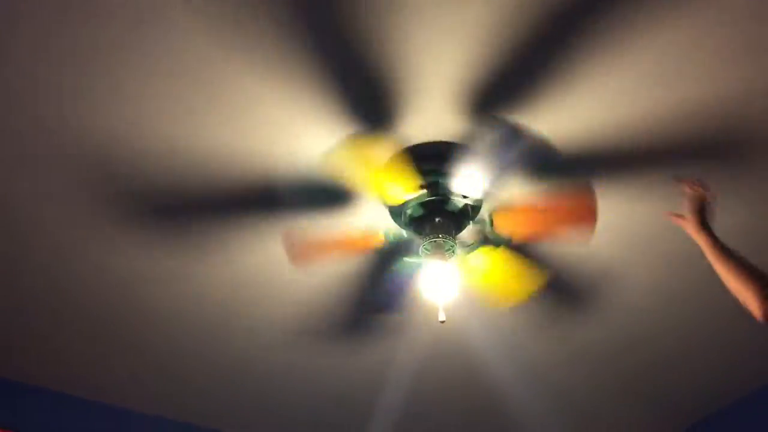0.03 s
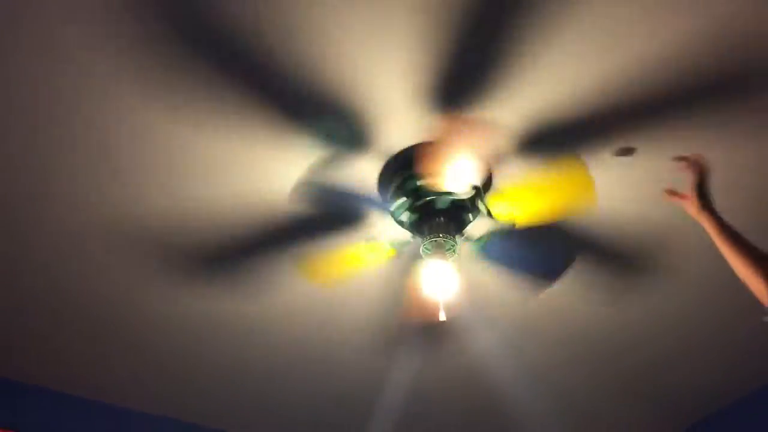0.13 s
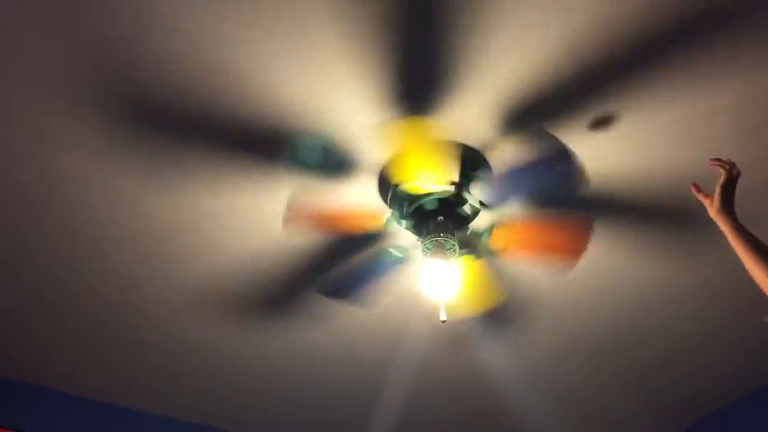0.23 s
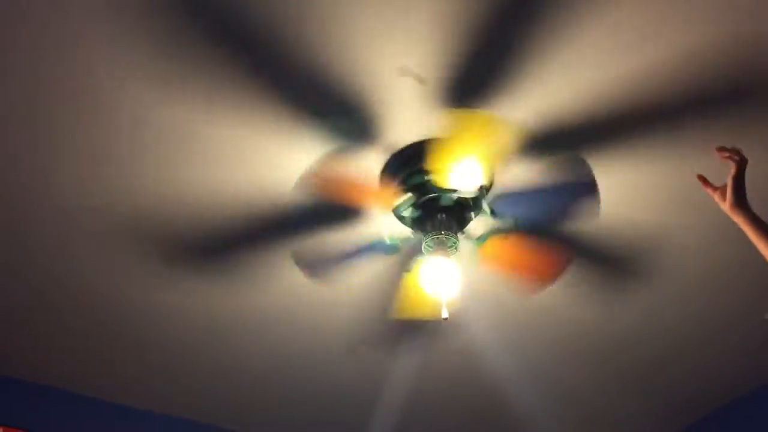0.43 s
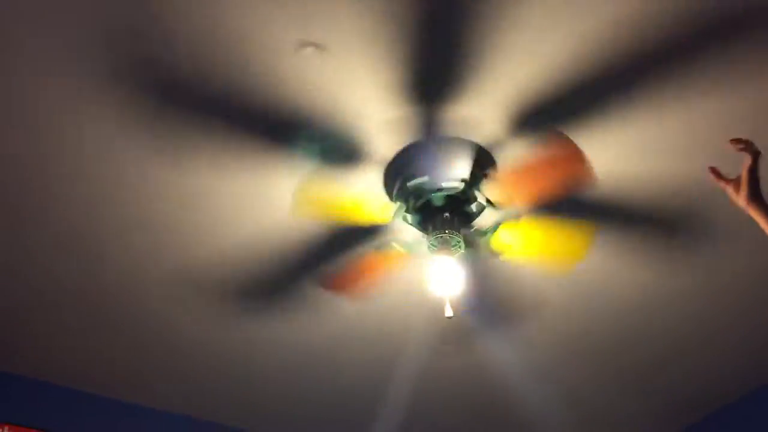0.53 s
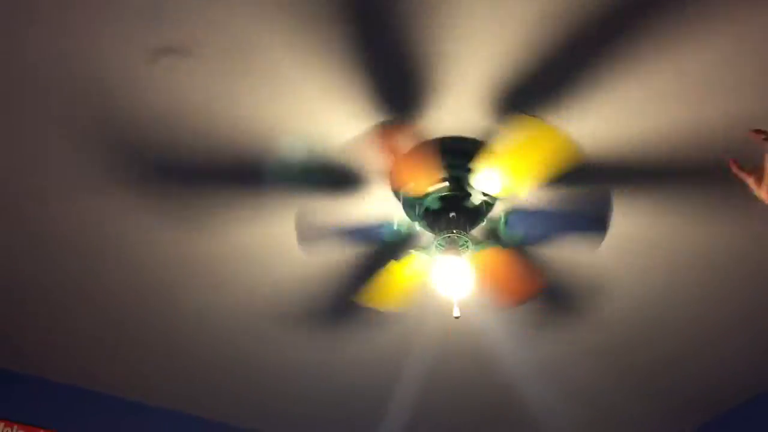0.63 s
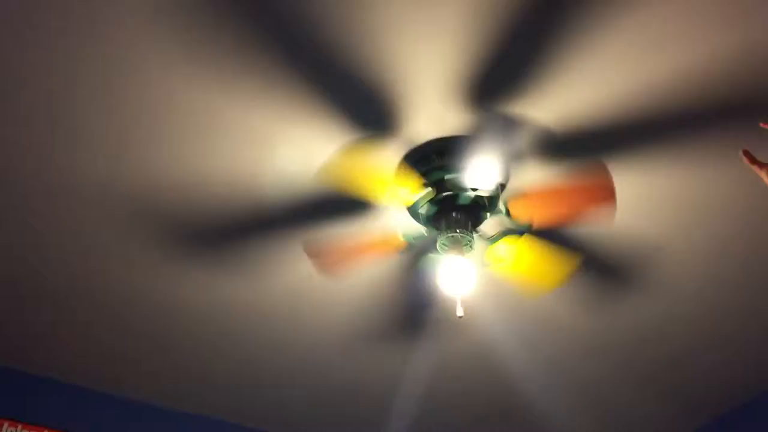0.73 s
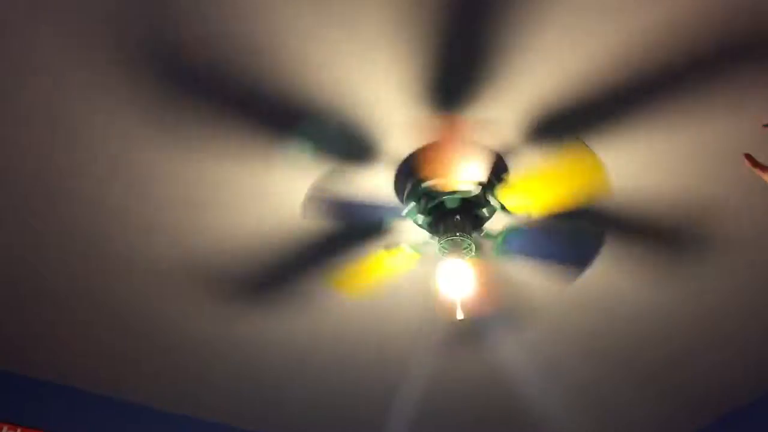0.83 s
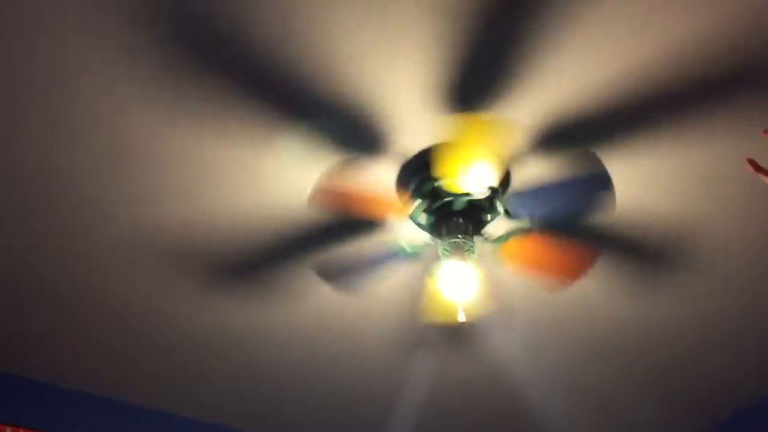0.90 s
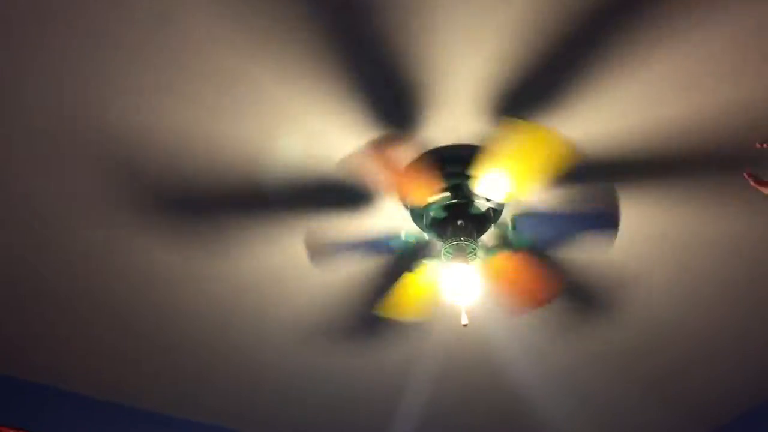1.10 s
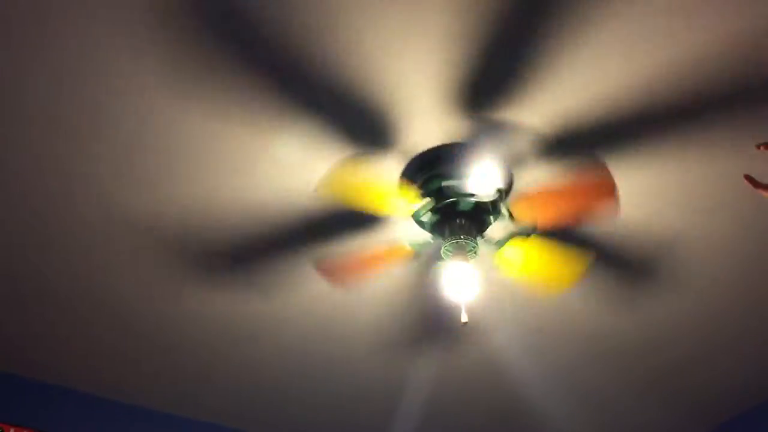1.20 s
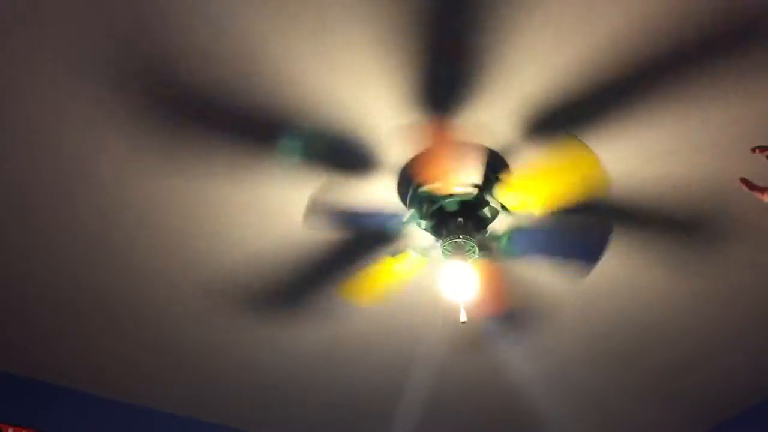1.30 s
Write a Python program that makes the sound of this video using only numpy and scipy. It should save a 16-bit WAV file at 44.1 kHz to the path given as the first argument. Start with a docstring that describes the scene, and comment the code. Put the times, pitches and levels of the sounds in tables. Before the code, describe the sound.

A small hard object cracks against a ceiling fan blade in a bare-sounding room. It first clicks lightly at about 0.2 seconds, then the blade hits it at 0.35 seconds with one loud, sharp crack that rings briefly. Around 1 second it lands farther off with a soft, tumbling thud. The fan's quiet, low motor hum and faint moving air continue throughout.

```python
"""In a bare-sounding room, a small hard object is tossed at a spinning ceiling fan.
It leaves the hand with a faint tick and clicks on the way up, probably against the ceiling.
A blade strikes it with a crack, exciting the damped normal modes of both bodies, and it lands
further off with a soft thud. Reflections and a reverberant tail follow the impacts.
Throughout, the motor hums at harmonics of the mains frequency over a little moving air."""
import sys
import numpy as np
from scipy import signal
from scipy.fft import rfft, irfft
from scipy.io import wavfile
from scipy.ndimage import uniform_filter1d

SR = 44100
rng = np.random.default_rng(int(sys.argv[2]) if len(sys.argv) > 2 else 0)


def store_pcm(level_fs):
    """Save levels as 16-bit WAV."""
    pcm = np.round(np.clip(level_fs, -1, 1) * 32767).astype(np.int16)
    wavfile.write(sys.argv[1], SR, np.atleast_2d(pcm).T)


N = 59535

# Contacts of each kind: t/s, level/dB
BLADE_HITS = [(0.3543, 9.14)]
BRUSH = [(0.1937, -16)]
GLANCES = [(0.1938, -16.5), (0.1972, -9.5), (0.1996, -9.5), (0.2018, -9.5), (0.2069, -14)]
LANDINGS = [(1.030, -27), (1.039, -19.5), (1.0465, -22.5), (1.0545, -22.5)]
RELEASE = [(0.127, -40), (0.135, -38.5)]
# Spectral envelopes of the contacts: f/Hz, relative level/dB
CRACK_SPECTRUM = [(120, -35.5), (300, -25), (480, -25), (650, -14.5), (850, -18), (1130, -11.5), (1330, -2),
                  (1550, -7), (1790, -6.5), (2060, -12), (2450, -4), (2680, -9.5), (2930, -2.5),
                  (3400, -9.5), (4400, -2), (4900, -5.5), (5600, -1.5), (6800, -10), (9000, -13.5),
                  (11000, -19.5), (15000, -24)]
BRUSH_SPECTRUM = [(100, -13.5), (220, 4), (450, 0), (650, 1), (850, -1), (1200, 4), (3000, -0.5),
                  (7000, -8), (15000, -17.5)]
GLANCE_SPECTRUM = [(120, -22.5), (280, -17), (1000, -13.5), (2900, -9.5), (4300, 0.5), (5400, 0),
                   (6200, -4.5), (7800, -35), (9700, -20), (11500, -32.5), (15000, -35)]
THUD_SPECTRUM = [(70, -16), (150, 7.5), (260, -2), (440, 4), (560, -15), (950, -11), (1600, -14),
                 (2900, -26.5), (3900, -20), (5000, -32.5), (15000, -44)]
RELEASE_SPECTRUM = [(300, -16), (1400, 3), (4000, -3), (8000, -10.5), (15000, -20)]
# Normal modes of the blade and the heavily damped object: f/Hz, relative level/dB, T60/s
BLADE_MODES = [(983, -9, 0.38), (1081.7, -15, .28), (1294, -1, .3), (1706, -10, 0.35), (1767, -1, 0.44),
               (2430, -5.5, 0.23), (2451, -3, 0.19), (2853, -7, .32), (2942, -2.5, .34), (4030, -7, .28),
               (4372, -1.5, 0.17), (4432.4, -4, .28), (5070, -3, 0.22), (5850, -5.5, .26)]
OBJECT_MODES = [(4050, -7, 0.019), (5350, -1.5, .022), (5937.7, -9, .014)]
# Ticks of the tumbling object: t/s, level/dB, f/Hz
LANDING_TICKS = [(1.0343, -50.5, 3860), (1.0392, -44.5, 1980), (1.0471, -39.5, 1140), (1.055, -53.5, 3840),
                 (1.0575, -55, 1320), (1.073, -51.5, 1000), (1.096, -59, 1090)]
# Harmonics of the motor hum: f/Hz, level/dB
HUM_HARMONICS = [(60, -71), (120.05, -42.5), (240.1, -71), (360.2, -77.5), (480.2, -77), (720.3, -90),
                 (960.4, -87), (1080.5, -87)]
# Noise spectra of the swinging arm and the moving air: f/Hz, relative level/dB
RUSTLE_SPECTRUM = [(200, -5), (700, -2), (2000, -2), (4000, -9), (8000, -15), (15000, -16)]
AIR_SPECTRUM = [(20, -17), (40, -14), (60, -4), (85, 5), (150, -6), (190, -10.5), (235, -2.5), (275, -18.5),
                (350, -15), (450, -27), (600, -26.5), (1000, -27.5), (2000, -28), (4000, -33.5),
                (8000, -39.5), (15000, -42)]
# Reverberation time of the room: f/Hz, T60/s
ROOM_T60 = [(150, .3), (500, 0.28), (1000, 0.34), (1700, 0.51), (3000, 0.37), (5500, 0.38), (8000, .31),
            (14000, .22)]
# Early reflections: delay/s, amplitude ratio
REFLECTIONS = [(.0074, 0.23), (0.0103, 0.1), (0.0125, .35), (.022, 0.4)]


def blade_strike():
    """Impact excitation: the blade bats the object away with a crack, and both vibrate freely."""
    bodies = undb(-26.5) * ring(BLADE_MODES, waver_db=2) + undb(-6) * ring(OBJECT_MODES)
    radiated = high_pass(bodies, hz=1100, order=4)  # the ringing carries no low thump
    ringing = convolve(impulses([(s, 0) for s, _ in BLADE_HITS]), radiated)
    return ringing + contact(BLADE_HITS, CRACK_SPECTRUM, t60=0.018, wet_db=1)


def glance():
    """Oblique impact on a hard surface: brief contacts give a bright snap, a brush and a rattle."""
    edge = high_pass(rng.standard_normal(N) * decay(t60=0.0052), hz=4700, order=1)
    snap = convolve(impulses([(s, -31.5) for s, _ in BRUSH]), edge)
    brush = contact(BRUSH, BRUSH_SPECTRUM, t60=0.031, wet_db=-2.5)
    rattle = contact(GLANCES, GLANCE_SPECTRUM, t60=0.014, wet_db=1.5)
    return snap + brush + rattle


def landing(tick_t60=0.0097):
    """Inelastic collision: the object thuds and tumbles, each edge ticking at its own frequency."""
    ticks = sum(convolve(impulses([(s, db)]), ring([(hz, 0, tick_t60)])) for s, db, hz in LANDING_TICKS)
    return convolve(ticks, room(wet_db=-13)) + contact(LANDINGS, THUD_SPECTRUM, t60=0.033, wet_db=-5)


def toss(swing_end_s=0.3, fade_s=0.15):
    """Friction noise: the swinging arm rustles, and the object slips off the fingers with a tick."""
    swing = np.clip((swing_end_s - np.arange(N) / SR) / fade_s, 0, 1)
    rustle = undb(-73) * swing * noise(RUSTLE_SPECTRUM)
    return rustle + contact(RELEASE, RELEASE_SPECTRUM, t60=0.03, wet_db=2.5)


def motor_hum():
    """Forced vibration: the motor hums chiefly at twice the mains frequency; each harmonic wavers."""
    t, hum = np.arange(N) / SR, 0
    for k, (hz, db) in enumerate(HUM_HARMONICS):
        waver_db = 0.9 if k == 1 else 1.5  # the strongest harmonic is the steadiest
        amplitude = np.sqrt(2) * undb(db + waver_db * drift(per_s=18))
        hum = hum + amplitude * np.sin(2 * np.pi * (hz * t + rng.random()))
    return hum


def moving_air(flutter_db=3.5, flutter_below_hz=600):
    """Flow noise: moving air gives a faint broadband hiss whose bass flutters."""
    air = noise(AIR_SPECTRUM)
    bass = signal.sosfiltfilt(signal.butter(2, flutter_below_hz, fs=SR, output="sos"), air)
    flutter = undb(flutter_db * drift(per_s=13))
    return undb(-60) * (air - bass + bass * flutter)


def room(wet_db, size=20480, build_s=0.004, grain=0.45):
    """Reverberation: direct sound, early reflections and a grainy tail decaying band by band."""
    t, hz = np.arange(size) / SR, np.fft.rfftfreq(size, 1 / SR)
    scatter = rfft(rng.standard_normal(size) * np.exp(grain * rng.standard_normal(size)))
    tail = 0
    for centre, t60 in ROOM_T60:
        band = along([(f, f == centre) for f, _ in ROOM_T60], hz)
        tail = tail + irfft(scatter * band) * decay(t60, size)
    response = undb(wet_db) * unit_energy(tail * (1 - np.exp(-t / build_s)))
    response[0] += 1
    for delay, gain in REFLECTIONS:
        response[int(delay * SR)] += gain
    return response


def contact(rows, spectrum, t60, wet_db):
    """Source and filter: shaped bursts, each with its own room tail because the object moves."""
    pulse, out = click(spectrum), np.zeros(N)
    for s, db in rows:
        start = int(s * SR)
        burst = convolve(noise_burst(t60), pulse)
        heard = convolve(burst, room(wet_db))[:N - start]
        out[start:start + len(heard)] += undb(db) * heard
    return out


def ring(modes, waver_db=0):
    """Modal superposition: damped sinusoids of alternating sign, whose levels may waver."""
    t, out = np.arange(N) / SR, 0
    for k, (hz, db, t60) in enumerate(modes):
        level_db = db + waver_db * drift(per_s=45) if waver_db else db
        out = out + (-1) ** k * undb(level_db) * decay(t60) * np.sin(2 * np.pi * hz * t)
    return out


def click(spectrum, size=2048):
    """Minimum phase: folding the cepstrum gives the shortest causal pulse with this spectrum."""
    magnitude = undb(along(spectrum, np.fft.rfftfreq(size, 1 / SR)))
    cepstrum = irfft(np.log(magnitude))
    cepstrum[1:size // 2] *= 2
    cepstrum[size // 2 + 1:] = 0
    return unit_energy(irfft(np.exp(rfft(cepstrum))))


def noise_burst(t60, size=4096, smooth_bins=16):
    """Whitening: decaying noise with its broad spectral humps evened out."""
    spectrum = rfft(rng.standard_normal(size) * decay(t60, size), 2 * size)
    power = uniform_filter1d(np.abs(spectrum) ** 2, smooth_bins)
    return unit_energy(irfft(spectrum / np.sqrt(power))[:size])


def noise(spectrum):
    """Spectral shaping: stationary noise of unit rms."""
    magnitude = undb(along(spectrum, np.fft.rfftfreq(N, 1 / SR)))
    x = irfft(rfft(rng.standard_normal(N)) * magnitude, N)
    return x / x.std()


def impulses(rows):
    """Impulse approximation: one spike for each contact."""
    out = np.zeros(N)
    for s, db in rows:
        out[int(s * SR)] += undb(db)
    return out


def drift(per_s):
    """Random modulation: smoothed steps with a spread near one."""
    hold = int(SR / per_s)
    steps = np.repeat(rng.standard_normal(N // hold + 4), hold)
    return np.sqrt(2) * uniform_filter1d(uniform_filter1d(steps, hold), hold)[hold:hold + N]


def decay(t60, size=N):
    """Exponential damping: 60 dB in t60 seconds."""
    return np.exp(-np.log(1000) * np.arange(size) / SR / t60)


def high_pass(x, hz, order):
    """High-pass filtering: attenuation below the cutoff."""
    return signal.sosfilt(signal.butter(order, hz, "high", fs=SR, output="sos"), x)


def convolve(x, response):
    """Convolution: a sound passes through a linear system."""
    return signal.fftconvolve(x, response)[:N]


def along(points, hz):
    """Interpolation on a logarithmic frequency axis."""
    f, values = np.array(points, float).T
    return np.interp(np.log(np.maximum(hz, 1)), np.log(f), values)


def unit_energy(x):
    """Normalisation to an energy of one."""
    return x / np.sqrt(np.sum(x ** 2))


def undb(db):
    """Decibel law: level to amplitude ratio."""
    return 10 ** (np.asarray(db) / 20)


def scene():
    """Superposition: the running fan and the sounds of the throw add in one channel."""
    return (motor_hum() + moving_air() + toss() + glance() + blade_strike() + landing())[None]


def record(dry, top_hz=15000):
    """Saturation and band limiting: the microphone rounds the loudest peaks and cuts the top."""
    rounded = np.tanh(1.214 * dry) / 1.168
    return signal.sosfilt(signal.ellip(10, .2, 70, top_hz, fs=SR, output="sos"), rounded)


dry = scene()
out = record(dry)
store_pcm(out)
```